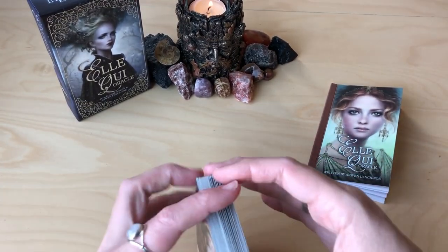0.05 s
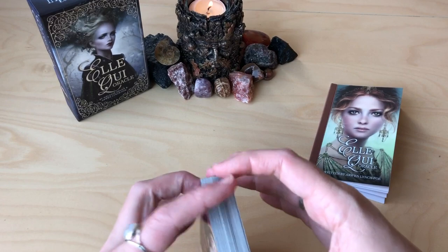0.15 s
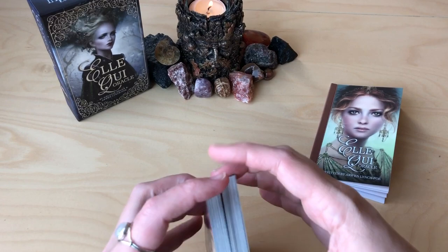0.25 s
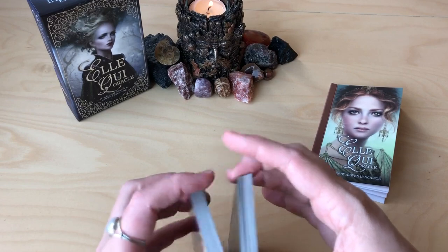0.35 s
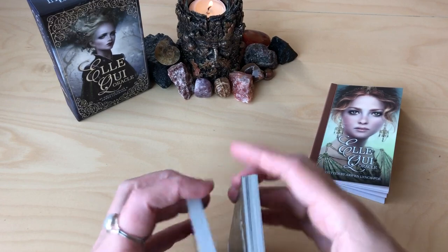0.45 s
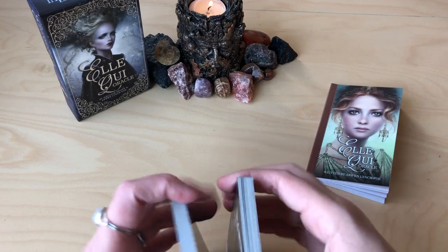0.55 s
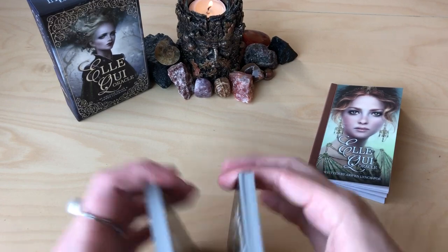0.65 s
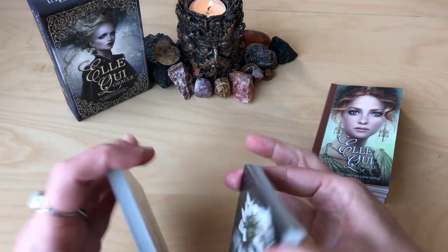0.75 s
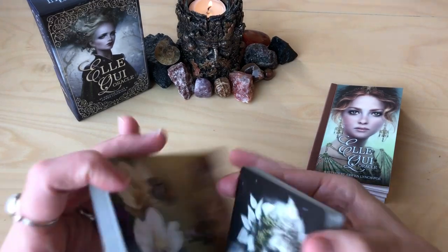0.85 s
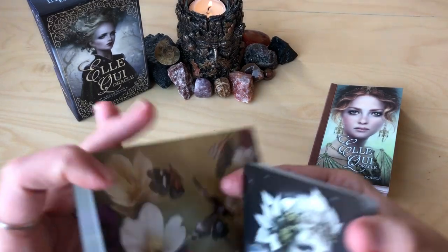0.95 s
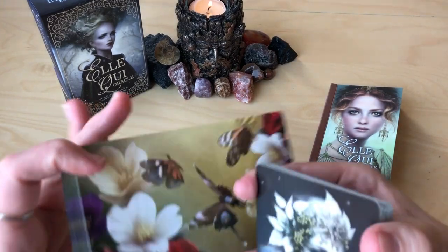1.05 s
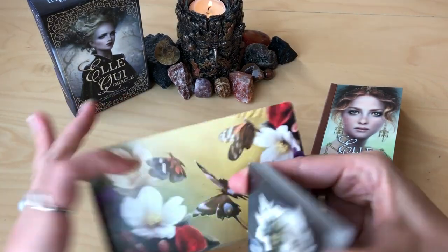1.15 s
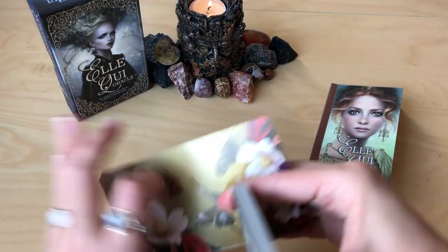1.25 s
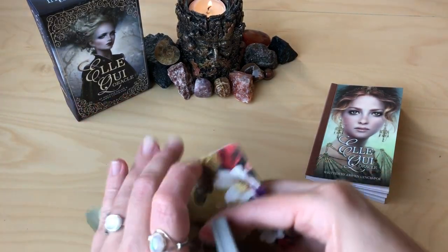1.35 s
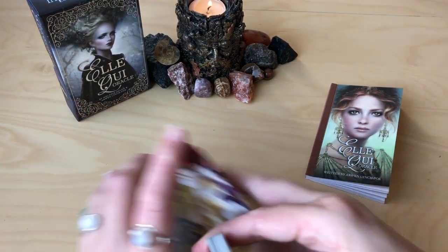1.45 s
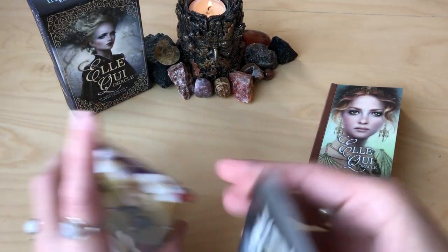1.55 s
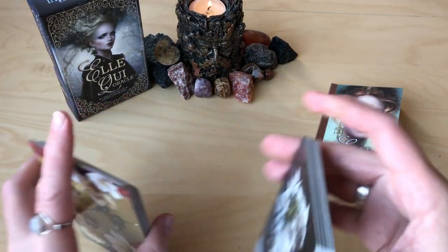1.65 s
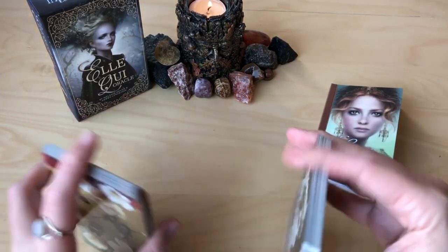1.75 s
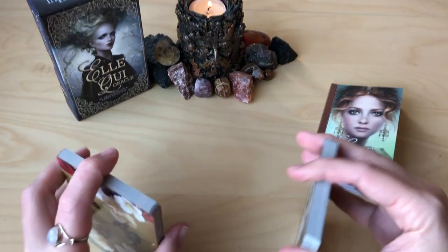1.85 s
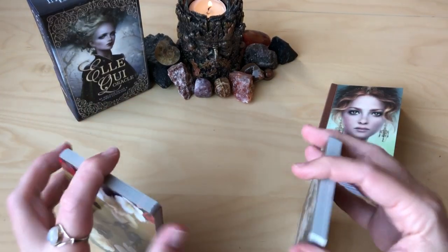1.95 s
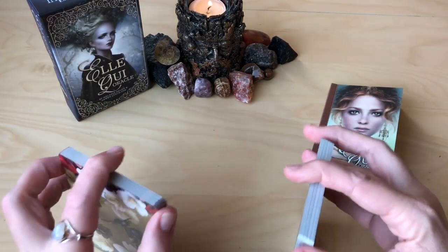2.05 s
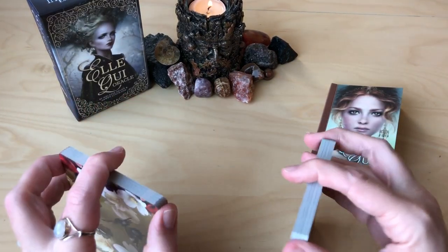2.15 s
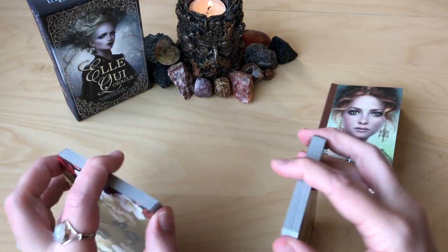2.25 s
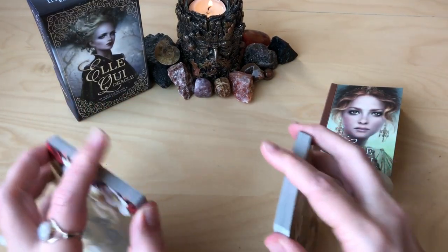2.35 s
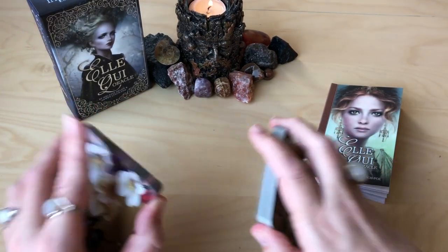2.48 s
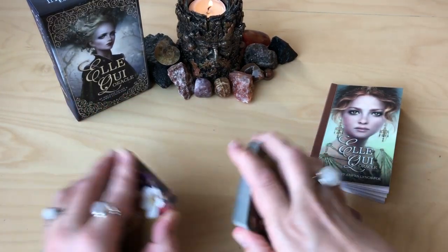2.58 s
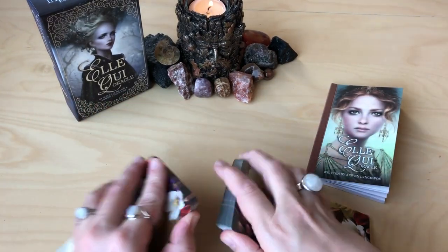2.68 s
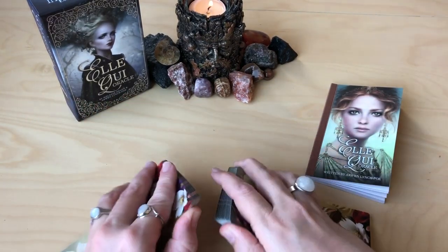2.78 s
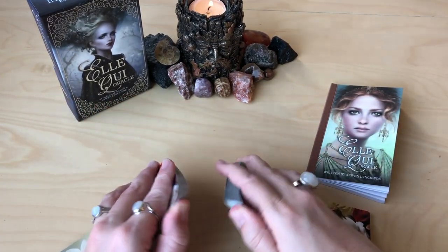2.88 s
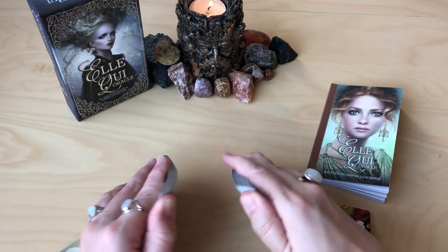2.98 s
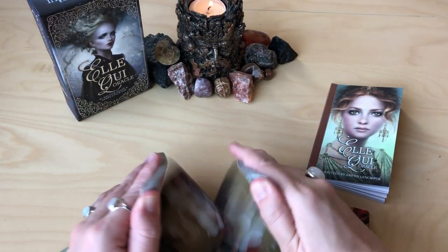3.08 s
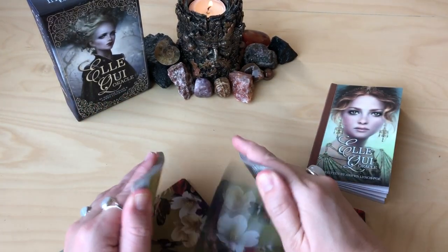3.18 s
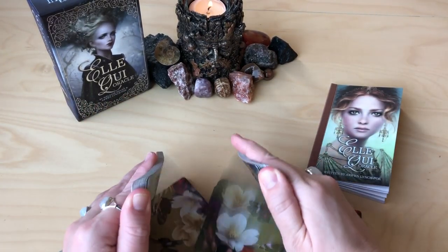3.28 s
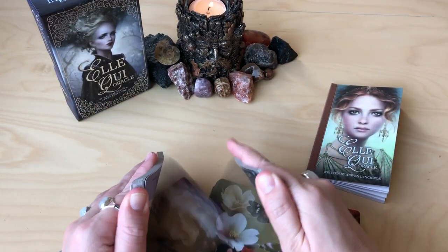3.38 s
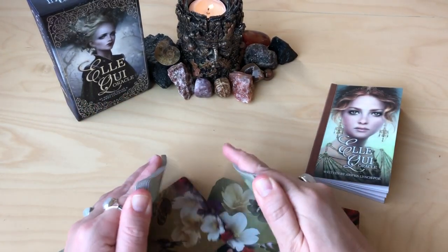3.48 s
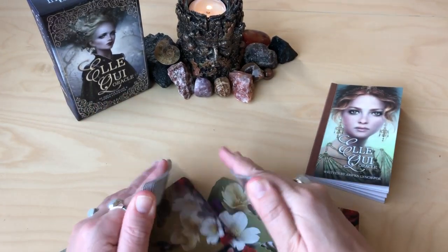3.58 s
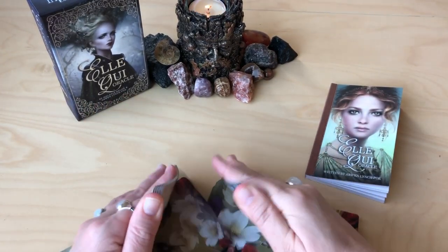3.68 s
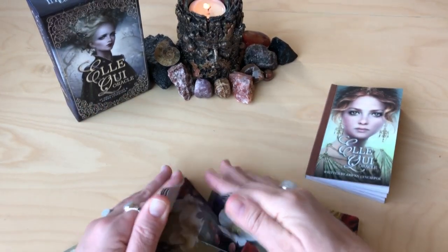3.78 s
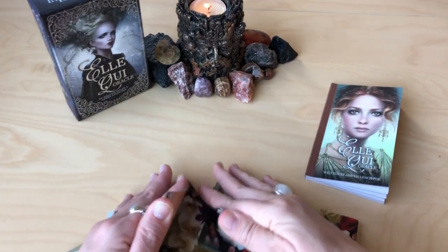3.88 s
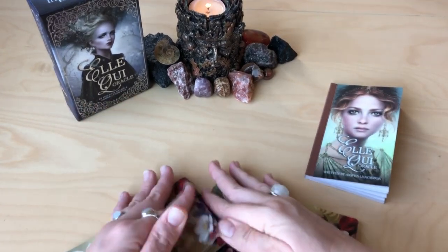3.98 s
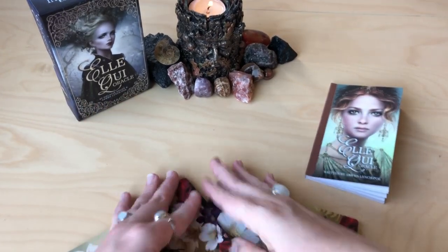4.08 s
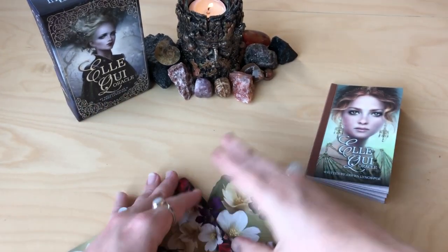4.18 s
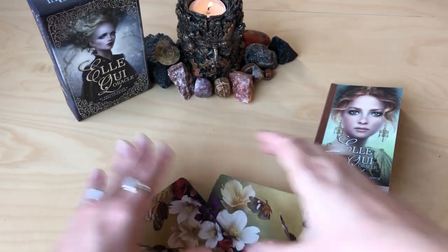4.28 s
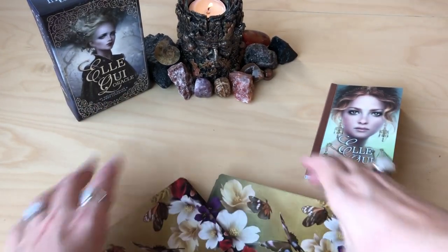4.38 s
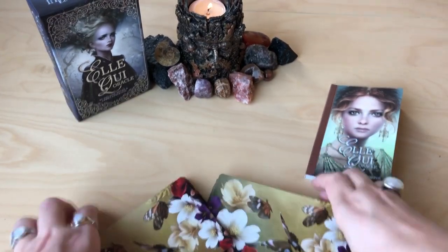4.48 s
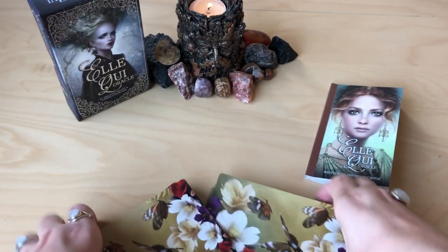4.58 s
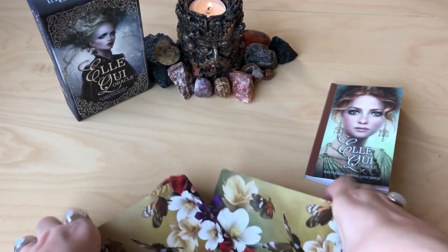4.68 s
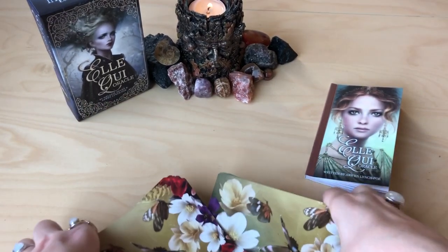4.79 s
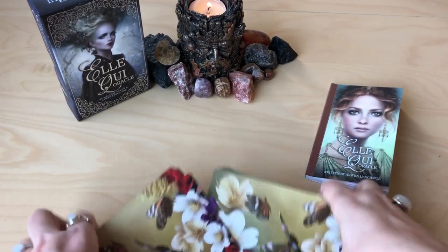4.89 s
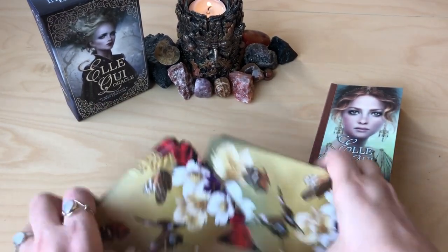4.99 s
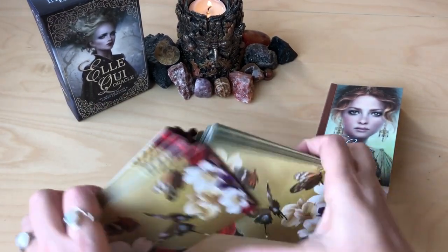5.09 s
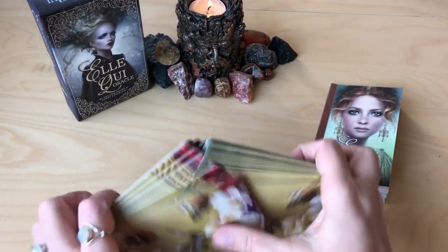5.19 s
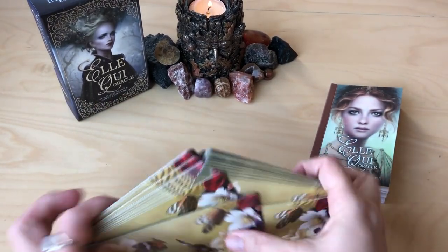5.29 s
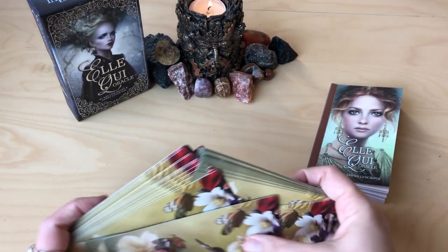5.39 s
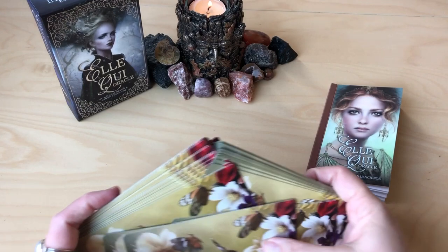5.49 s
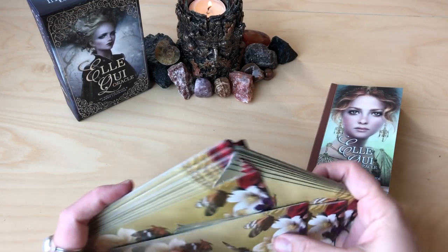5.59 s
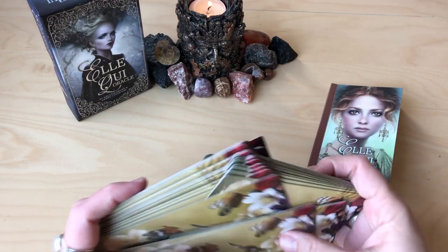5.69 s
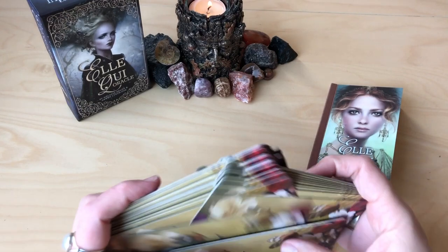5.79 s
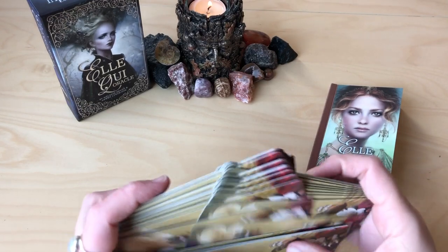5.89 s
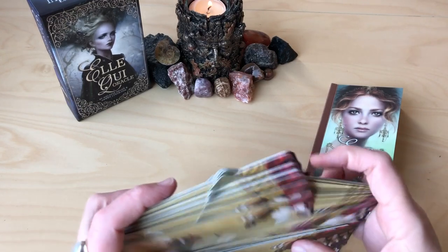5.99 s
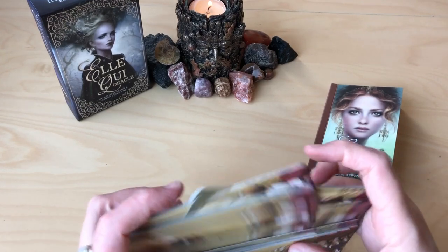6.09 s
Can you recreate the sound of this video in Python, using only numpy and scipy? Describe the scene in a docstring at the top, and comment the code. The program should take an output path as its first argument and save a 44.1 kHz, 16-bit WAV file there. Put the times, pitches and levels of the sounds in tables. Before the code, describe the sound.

Close, dry sounds of a stiff card deck at a wooden table in a small quiet room. Faint rubs and slides come first, then a sharp double knock with clacking edges. After a pause, cards snap off the thumbs, starting with a few hollow slaps and quickening into a crisp flutter. Soft bumps and papery swishes follow, ending in a loud burst of bright clacks as the halves close up.

```python
"""In a small quiet room, at a wooden table, a deck of large stiff cards is cut, knocked and riffle-shuffled.
Cards snap off the thumbs one by one or slap down in packets; then the halves slide together and their edges clack.
Snaps, clacks and knocks are short bursts of shaped noise; rubs and swishes are grainy noise that swells and fades.
Flat packets add a sinking pop, the table top rings in decaying tones, and echoes, air and a faint hum surround it all."""
import sys
import numpy as np
from scipy import signal
from scipy.fft import rfft, irfft
from scipy.io import wavfile

SR = 44100
rng = np.random.default_rng(int(sys.argv[2]) if len(sys.argv) > 2 else 0)


def pcm_store(signal):
    """Save signal as 16-bit PCM."""
    levels = np.round(np.clip(np.atleast_2d(signal), -1, 1) * 32767)
    wavfile.write(sys.argv[1], SR, levels.astype(np.int16).T)


N = 270774
TIME = np.arange(N) / SR
HIT_SIZE = 4096  # samples in one short hit
HIT_TIME = np.arange(HIT_SIZE) / SR

# still room air, relative power at each pitch: f/Hz, level/dB
AIR_COLOUR = [(20, -16), (40, -2.5), (60, 7.5), (85, -4), (130, 4), (200, -1.5), (290, 1), (450, -12),
              (1000, -15.5), (3000, -24), (8000, -28.5), (16000, -29)]
AIR_DB = -68.5
# a sliding card sticks and slips fast enough to whisper a pitch: peak t/s, level of the lower band/dB
SQUEAKS = [(1.358, -64), (5.075, -60)]
SQUEAK_HZ, SQUEAK_S = 2940, .055
# card faces slide over each other: peak t/s, length/s, level at the peak/dB, brightness/(dB per octave)
SWISHES = [(0, .08, -64, -8), (0.536, 0.064, -67, -10), (0.734, 0.016, -60.5, 3), (1.127, 0.032, -58, 1.5),
           (1.374, 0.052, -60.5, 1.5), (1.64, .075, -70, 4), (2.571, 0.025, -53, -1),
           (2.853, 0.38, -76.5, -3), (4.565, 0.051, -48.5, -2.5), (4.71, 0.078, -54.5, -5),
           (5.026, 0.15, -59.5, -1.5), (5.165, 0.17, -54, 3), (5.403, 0.1, -51, -5),
           (5.767, 0.32, -62.5, 1)]
# fingers and card edges drag along the deck: peak t/s, length/s, level at the peak/dB
RUBS = [(.005, 0.045, -58.5), (0.133, 0.18, -68), (0.378, 0.06, -59.5), (0.554, 0.084, -57),
        (0.734, 0.036, -55), (1.793, .04, -58), (2.11, 0.073, -62), (5.286, 0.047, -53),
        (5.402, 0.16, -54.5), (5.862, 0.08, -44), (6.053, .14, -40)]
RISE_SHARE = 0.43  # part of a stroke's length that shapes the speeding up
# tones of the table top: f/Hz, relative level/dB, time to fall 60 dB before the wrists damp it/s
TABLE_TONES = [(146.1, -0.5, 0.83), (322, -5, 1), (472, -18.5, 0.69), (548.8, 2.5, 0.27), (656, -5, 0.14),
               (839, -3.5, 0.65), (910, -5.5, 0.26), (1080, -4, 0.6), (1090, 3, 0.28), (1330, 3, 0.37)]
# the deck or a hand meets the table: t/s, level over 10 ms/dB, brightness/(dB per octave)
KNOCKS = [(1.746, -51.5, -1.5), (1.8035, -32, -2.5), (1.8691, -24.5, -.5), (2.55, -54.5, 3),
          (2.633, -52, -13.5), (4.006, -39.5, -6.5), (4.016, -48.5, -18), (4.0461, -38, 0.5),
          (4.508, -49, -7.5), (4.552, -48.5, -9), (4.674, -50, -11.5), (4.874, -53.5, -10),
          (5.248, -48.5, 5.5), (5.378, -44.5, 0), (5.616, -53.5, 1), (5.789, -42, 1), (6.066, -35, 0.5),
          (6.132, -40, 2.5)]
# card edges hit each other in the held deck: t/s, level over 10 ms/dB, brightness/(dB per octave)
CLACKS = [(0.9681, -63, 0), (1.108, -57.5, 3), (1.472, -65.5, 9.5), (1.8364, -38, 5.5),
          (1.8412, -30.5, -0.5), (1.8695, -37, 0.5), (2.55, -52, 6.5), (2.6321, -56.5, 1.5),
          (4.7382, -53, 3), (4.8327, -50, 3.5), (4.8725, -45.5, 3), (5.245, -45.5, -5), (5.615, -56, -1),
          (5.7881, -41.5, 0), (5.8131, -32, 8), (5.8344, -27, 10), (5.8532, -37, 2), (5.8949, -37.5, -0.5),
          (5.928, -33.5, 0.5), (5.9439, -39, 0), (6.0278, -24, 8), (6.0343, -25, 3), (6.0597, -26.5, 4),
          (6.086, -28.5, 2), (6.102, -32.5, 2.5), (6.1238, -26, 1)]
# loosened cards tumble into place one after another: start t/s, end t/s, typical level of each/dB
TUMBLES = [(1.857, 1.91, -38.5), (5.797, 5.885, -42.5), (5.965, 6.03, -46.5), (6.04, 6.14, -36)]
TUMBLE_GAP_S, TUMBLE_TILT_DB = .012, -1.5  # mean time between cards; mean brightness, dB per octave
# the thumbs bend the halves and let them run; how hard they press: t/s, level/dB
THUMB_PRESS = [(3.09, -7.5), (3.14, -1), (3.21, -5.5), (3.5, 1), (3.62, 1), (3.87, -5.5), (4.071, -9.5),
               (4.251, -22)]
CREEP_DB, CREEP_TILT_DB = -47.5, -5.5  # hiss of the bent cards: level before thumb pressure; dB per octave
# several cards leave as one and land flat: t/s, level of their snaps/dB, fall time/s,
# level of the pop/dB, middle of its sinking pitch f/Hz
PACKETS = [(3.1415, -33.5, 0.0041, -31, 1420), (3.3629, -26.5, 0.003, -25, 1410),
           (3.481, -25.5, .0039, -24.5, 1780), (4.002, -34, 0.0041, -38.5, 1100),
           (4.0409, -32.5, .0062, -35, 1495)]
# one card slips off a thumb: t/s, level over 10 ms/dB
SNAPS = [(0.9146, -59), (3.091, -52.5), (3.1498, -27.5), (3.17, -43.5), (3.2255, -44.5), (3.2528, -25.5),
         (3.3268, -38.5), (3.3476, -35), (3.4039, -37.5), (3.4547, -38.5), (3.472, -35.5), (3.5305, -35.5),
         (3.564, -38.5), (3.5698, -37), (3.627, -34), (3.639, -34.5), (3.686, -31.5), (3.7152, -32.5),
         (3.724, -40), (3.748, -29.5), (3.7654, -33.5), (3.783, -30), (3.796, -33), (3.8172, -29),
         (3.8274, -32), (3.8613, -28.5), (3.87, -32.5), (3.9004, -37), (3.908, -28.5), (3.9299, -28.5),
         (3.994, -37.5), (4.0067, -31.5), (4.0445, -35.5), (4.2062, -45.5)]
# snaps are brighter the more the cards are bent, most at the start of the riffle: t/s, brightness/(dB per octave)
BEND = [(.9, -5.5), (3.15, 4.5), (3.45, 0.5), (3.63, -0.85), (3.93, 0)]
SNAP_HOLD = 1.1  # above 1: the snap stays, then stops short
# decay of a neutral hit in seconds; it halves with every so many dB per octave of brightness
KNOCK_S, KNOCK_HALVING_DB = 0.0057, 11.5
CLACK_S, CLACK_HALVING_DB = 0.0088, 6
SNAP_S, SNAP_HALVING_DB = 0.0016, 9
# tone colour of sliding card faces: f/Hz, relative level/dB
SWISH_COLOUR = [(100, -18), (600, -11.5), (1500, -6), (3000, -4.5), (6000, -4), (8200, -8), (10000, -8),
                (16000, -15)]
# tone colour of dragging skin and edges: f/Hz, relative level/dB
RUB_COLOUR = [(25, -17), (70, -16.5), (150, -6.5), (500, -1), (1100, -5), (2000, -8), (3000, -16),
              (5000, -24), (9000, -31.5), (16000, -26.5)]
# tone colour of a blow on the wood: f/Hz, relative level/dB
KNOCK_COLOUR = [(28, -59), (65, -12), (130, -5), (260, -6.5), (480, -2), (900, -4), (1900, -11.5),
                (3300, -22.5), (4500, -28), (7500, -41.5), (16000, -63.5)]
# tone colour of colliding card edges: f/Hz, relative level/dB
CLACK_COLOUR = [(30, -56.5), (100, -26), (500, -8.5), (1000, 3), (1400, 3), (2300, 3.5), (3000, -1),
                (4600, -2), (5700, -9.5), (7000, -12.5), (8300, -18), (9400, -9.5), (11000, -24.5),
                (16000, -33)]
# tone colour of a card flicking free: f/Hz, relative level/dB
FLICK_COLOUR = [(30, -52), (120, -32.5), (600, -16), (1100, -6), (2200, -8.5), (3000, -2.5), (3900, -7),
                (5100, -5.5), (7300, -6.5), (8200, -9.5), (10500, -7), (16000, -7.5)]
# tone colour of the air pushed out under a landing card: f/Hz, relative level/dB
PUFF_COLOUR = [(28, -43.5), (65, 0), (140, 4.5), (350, -3.5), (700, -7), (1300, -11), (3000, -22),
               (16000, -57.5)]
TOP_HZ = 15900  # the microphone hears little above this


def undb(db):
    """Turn decibels into a gain."""
    return 10 ** (np.asarray(db) / 20)


def unit(x):
    """Scale a sound to an average (rms) strength of 1."""
    return x / np.sqrt(np.mean(x ** 2) + 1e-30)


def blow(x, db):
    """Scale a short sound so that its energy, spread over 10 ms, has this level."""
    return x * undb(db) * np.sqrt(SR / 100 / (np.sum(x ** 2) + 1e-30))


def add(out, s, x):
    """Mix x into out at time s."""
    i = min(max(int(s * SR), 0), N)
    out[i:i + len(x)] += x[:N - i]


def follow(curve, s):
    """Read a value at time s from a curve of points joined by straight lines."""
    return np.interp(s, *np.transpose(curve))


def colour(x, points, tilt_db=0, ripple_db=0, size=2048, count=48):
    """Filter through (Hz, dB) points, tilted by dB per octave, with fresh random bumps of up to ripple_db."""
    octave = np.log2(np.maximum(np.arange(size // 2 + 1) * SR / size, 10))
    hz, db = np.transpose(points)
    heights = rng.uniform(-1, 1, count)
    # the square root packs the bumps closer together in the treble
    place = np.sqrt(np.linspace(0, 1, len(octave)))
    bumps = np.interp(place, np.linspace(0, 1, count), heights)
    tilt = tilt_db * np.clip(octave - 10, -2, 4)  # pivots near 1 kHz
    gain = undb(np.interp(octave, np.log2(hz), db) + tilt + ripple_db * bumps)
    # folding the cepstrum makes the filter answer at once, never early
    cepstrum = irfft(np.log(gain))[:size // 2]
    cepstrum[1:] *= 2
    response = irfft(np.exp(rfft(cepstrum, size)))
    return signal.oaconvolve(x, response)[:len(x)]


def dull(x, hz):
    """The hands shade the treble: soften everything above hz."""
    return signal.sosfilt(signal.butter(2, hz, fs=SR, output="sos"), x)


def contact(decay, rise, hold=0.74):
    """The brief chatter of two surfaces that meet; a hold above 1 makes it stay and then stop short."""
    fade = np.exp(-np.minimum((HIT_TIME / max(decay, 1e-4)) ** hold, 60))
    return rng.standard_normal(HIT_SIZE) * fade * (1 - np.exp(-HIT_TIME / rise))


def friction(rate, spread_db, smooth, catch_s):
    """Random slips of unequal size (rate per second), each a brief scratch, over a smooth hiss."""
    sizes = undb(spread_db * np.minimum(rng.exponential(size=N), np.pi))
    slips = (rng.random(N) < rate / SR) * sizes
    scratch = unit(signal.lfilter([1], [1, -np.exp(-1 / (catch_s * SR))], slips))
    return scratch * rng.standard_normal(N) + smooth * rng.standard_normal(N)


def stroke(peak, length):
    """Loudness of a hand movement that speeds up and slows down."""
    width = length * np.where(TIME < peak, RISE_SHARE, 1 - RISE_SHARE)
    return np.exp(-np.minimum(((TIME - peak) / width) ** 2, 40) / 2)


def background(hum_hz=100, hum_db=-69, hum_start_s=4.1):
    """Quiet room air is steady coloured noise; a faint mains hum, one pure tone, joins in."""
    fade_in = np.clip((TIME - hum_start_s) * 10, 0, 1)
    hum = np.sqrt(2) * np.sin(2 * np.pi * hum_hz * TIME) * fade_in
    air = unit(colour(rng.standard_normal(N), AIR_COLOUR, size=8192))
    return undb(AIR_DB) * air + undb(hum_db) * hum


def room(x, t60=0.45, treble_t60=0.3, split_hz=6000, build_s=0.001):
    """A small room: diffuse echoes build quickly and the treble dies first (t60: seconds to fall 60 dB)."""
    t = TIME[:int(.7 * SR)]
    noise = rng.standard_normal(len(t))
    low = signal.sosfilt(signal.butter(2, split_hz, fs=SR, output="sos"), noise)
    treble_noise = rng.standard_normal(len(t))
    high = signal.sosfilt(signal.butter(2, split_hz, "high", fs=SR, output="sos"), treble_noise)
    build = 1 - np.exp(-(t / build_s) ** 2)
    tail = (low * undb(-60 * t / t60) + high * undb(-60 * t / treble_t60)) * build
    return signal.fftconvolve(x, tail / np.sqrt(np.sum(tail ** 2)))[:N]


def table(force, ring_db=-21, loss_per_hz=0.12):
    """The table top rings on after a touch; resting wrists damp high tones more (dB per second per Hz)."""
    t = TIME[:SR // 2]
    ring = np.zeros(len(t))
    for hz, db, t60 in TABLE_TONES:
        fade = undb(-(60 / t60 + loss_per_hz * hz) * t)
        ring += undb(db) * np.sin(2 * np.pi * hz * t) * fade
    return signal.fftconvolve(force, ring / np.sqrt(np.sum(ring ** 2)) * undb(ring_db))[:N]


def squeaks(width=0.21, octave_db=-3):
    """Uneven stick-slip of a sliding card: a narrow band of noise and its octave."""
    out = np.zeros(N)
    for multiple, gain in (1, 1.0), (2, undb(octave_db)):
        edges_hz = multiple * SQUEAK_HZ * np.exp([-width / 2, width / 2])
        band = signal.butter(2, edges_hz, "band", fs=SR, output="sos")
        out += gain * unit(signal.sosfilt(band, rng.standard_normal(N)))
    return out * sum(undb(db) * stroke(s, SQUEAK_S) for s, db in SQUEAKS)


def swishes():
    """Card faces hiss with a fine grain as they slide, and as they creep under the thumbs."""
    grain = friction(rate=420, spread_db=7, smooth=0.99, catch_s=0.0016)

    def hiss(tilt_db):
        """Colour the shared grain with its own small bumps."""
        return unit(colour(grain, SWISH_COLOUR, tilt_db, ripple_db=1.5))

    held = (TIME > THUMB_PRESS[0][0]) & (TIME < THUMB_PRESS[-1][0])
    out = held * undb(CREEP_DB + follow(THUMB_PRESS, TIME)) * hiss(CREEP_TILT_DB)
    for s, length, db, tilt_db in SWISHES:
        out += undb(db) * stroke(s, length) * hiss(tilt_db)
    return out


def rubs():
    """Skin and card edges stick and slip against the deck."""
    grain = friction(rate=300, spread_db=2.5, smooth=0.61, catch_s=0.0025)
    out = np.zeros(N)
    for s, length, db in RUBS:
        out += undb(db) * stroke(s, length) * unit(colour(grain, RUB_COLOUR, ripple_db=3))
    return out


def knocks(rise=0.00087, thump_hz=132, thump_db=-20, thump_s=0.0081):
    """Blows on the wood: the softer the contact, the longer it lasts and the more the table top flexes, low."""
    out = np.zeros(N)
    thump = np.sin(2 * np.pi * thump_hz * HIT_TIME) * HIT_TIME * np.exp(-HIT_TIME / thump_s)
    for s, db, tilt_db in KNOCKS:
        decay = KNOCK_S * 2 ** (-tilt_db / KNOCK_HALVING_DB)
        add(out, s, blow(colour(contact(decay, rise), KNOCK_COLOUR, tilt_db), db))
        add(out, s, blow(thump, db + thump_db - 1.28 * tilt_db))  # duller knocks thump more
    return out


def clack(db, tilt_db, rise=0.00015):
    """Many stiff edges strike within a few milliseconds; the squarer they meet, the shorter and brighter."""
    decay = CLACK_S * 2 ** (-tilt_db / CLACK_HALVING_DB)
    return blow(colour(contact(decay, rise, hold=1.0), CLACK_COLOUR, tilt_db), db)


def clacks(jitter=.25, spread_db=5.0, tilt_spread_db=3.0, count=16):
    """The distinct clacks, and uneven runs of random ones as the cards settle."""
    out = np.zeros(N)
    for s, db, tilt_db in CLACKS:
        add(out, s, clack(db, tilt_db))
    for start, end, db in TUMBLES:
        for k, (shift, size, tilt) in enumerate(rng.standard_normal((count, 3))):
            s = start + TUMBLE_GAP_S * (k + jitter * shift * (k > 0))  # the first is on time
            card = clack(db + spread_db * size, TUMBLE_TILT_DB + tilt_spread_db * tilt)
            add(out, s, (s < end) * card)
    return out


def ticks(db=-47, spread_db=3, decay=0.0013, jitter_s=0.0052, count=52):
    """Cards still held creep along the thumbs with faint ticks, louder as the thumbs press."""
    out = np.zeros(N)
    times = np.linspace(THUMB_PRESS[0][0], THUMB_PRESS[-1][0], count + 2)[1:-1]
    for s, (shift, size, tilt) in zip(times, rng.standard_normal((count, 3))):
        tick = colour(contact(decay, 0.00066), FLICK_COLOUR, tilt, ripple_db=10)
        level_db = db + follow(THUMB_PRESS, s) + spread_db * min(size, 2)
        add(out, s + jitter_s * shift, blow(tick, level_db))
    return out


def flick(decay, tilt_db, rise=0.0005, crack_db=-6.5, crack_s=0.00025, flutter_db=-17, flutter_s=0.0043):
    """A card snaps free with a short sharp crack and a longer, duller flutter."""
    crack = np.roll(blow(contact(crack_s, rise), crack_db), int(rise * SR))
    body = blow(contact(decay, rise, SNAP_HOLD), 0)
    flutter = blow(contact(flutter_s, 0.0018), flutter_db)
    return colour(crack + dull(body + flutter, 11000), FLICK_COLOUR, tilt_db, ripple_db=3.5)


def packets(crack_db=-5, rise=0.000092, sag=0.64, pop_s=0.0037, tilt_db=0.1):
    """A packet chatters off the thumb as it falls, then lands flat: a hollow pop whose pitch sinks."""
    out = np.zeros(N)
    fade = np.exp(-HIT_TIME / pop_s)
    for s, snap_db, fall_s, pop_db, hz in PACKETS:
        add(out, s, blow(flick(fall_s, tilt_db), snap_db))
        sinking_hz = hz * (1 + sag * (fade - .5))
        pop = np.sin(2 * np.pi * np.cumsum(sinking_hz) / SR) * fade * (1 - np.exp(-HIT_TIME / rise))
        crack = colour(contact(pop_s, rise), CLACK_COLOUR, tilt_db=-3, ripple_db=11.5)
        add(out, s + fall_s, blow(pop, pop_db) + blow(crack, pop_db + crack_db))
    return out


def flicks(puff_db=-13, puff_s=0.0017, flight_s=.007):
    """Single cards snap off the thumbs and land a moment later on a cushion of air."""
    out = np.zeros(N)
    for s, db in SNAPS:
        tilt_db = follow(BEND, s)
        decay = SNAP_S * 2 ** (-tilt_db / SNAP_HALVING_DB)
        add(out, s, blow(flick(decay, tilt_db), db))
        # bright snaps only graze the thumb and move little air
        level_db = db + puff_db - 3.5 * max(tilt_db, 0)
        puff = blow(colour(contact(puff_s, 0.00057), PUFF_COLOUR, ripple_db=4.5), level_db)
        add(out, s + flight_s * rng.uniform(0.7, 1.4), puff)
    return out


def scene():
    """Thumb snaps are close and dry; blows through the deck and table reach the room more."""
    snap, slap = flicks() + ticks(), packets()
    edges, knock = clacks(), knocks()
    rub, swish = rubs(), swishes() + squeaks()
    wood = table(knock + undb(6.0) * edges + undb(-5) * rub + undb(-13.5) * snap)
    # the hands shade the edge clacks on their way into the room
    far = undb(-7.5) * dull(edges, 5600) + undb(-9.0) * knock + undb(-8.0) * rub
    near = undb(-14.0) * snap + undb(-14.5) * slap + undb(-8.0) * swish
    direct = snap + slap + edges + knock + rub + swish
    return (direct + wood + room(far + near) + background())[None]


def record(dry):
    """The phone microphone drops the deepest bass and cuts the top."""
    thin = signal.sosfilt(signal.butter(3, 42, "high", fs=SR, output="sos"), dry)
    return signal.sosfilt(signal.ellip(8, .2, 70, TOP_HZ, fs=SR, output="sos"), thin)


dry = scene()
out = record(dry)
pcm_store(out)
```